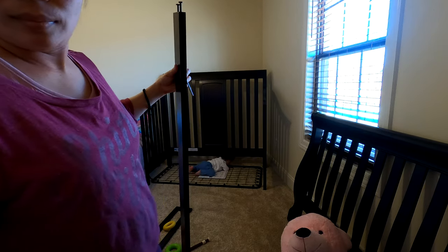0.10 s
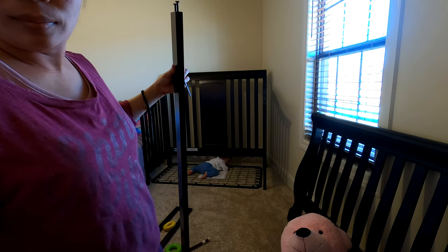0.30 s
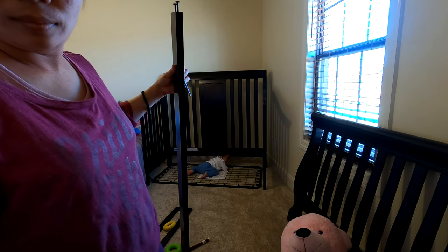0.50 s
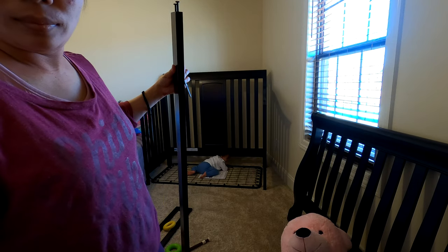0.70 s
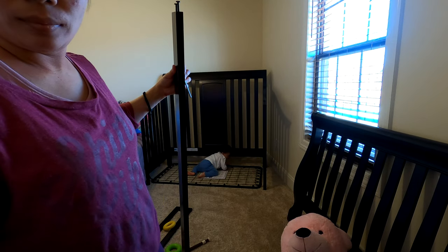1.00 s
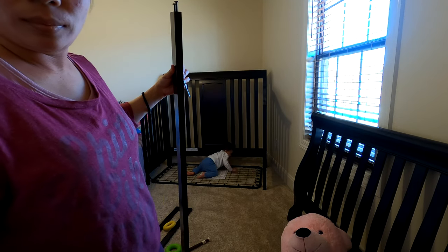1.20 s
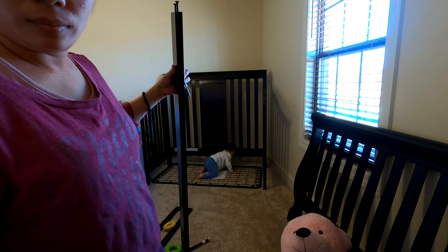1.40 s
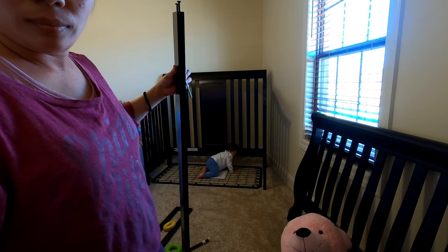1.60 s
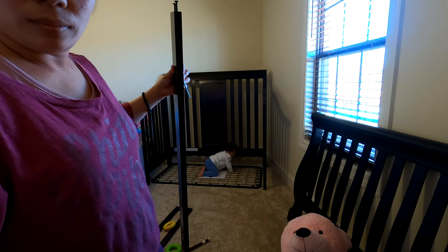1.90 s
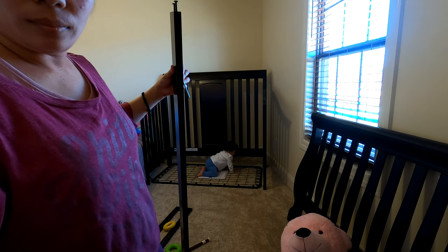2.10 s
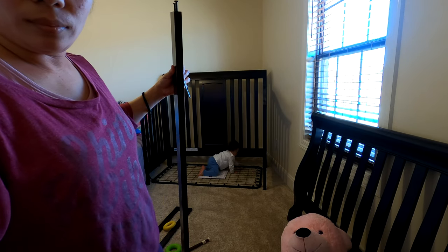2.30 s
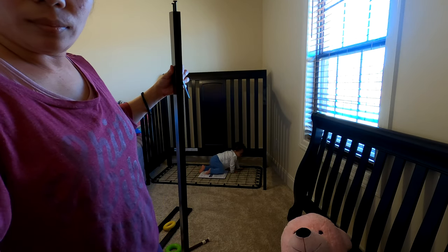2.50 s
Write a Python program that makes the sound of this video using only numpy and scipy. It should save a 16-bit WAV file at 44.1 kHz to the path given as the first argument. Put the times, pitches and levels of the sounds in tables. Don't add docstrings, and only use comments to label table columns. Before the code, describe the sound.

Close up and slightly left, a burst of bright metal clatter with a dull frame boom fades into scraping wire, pauses, then returns as clanks and short scrapes, with soft cloth rustle and a brief room echo.

```python
import sys
import numpy as np
from scipy import signal
from scipy.fft import rfft, irfft, next_fast_len
from scipy.io import wavfile
from scipy.ndimage import uniform_filter1d

SR = 44100
rng = np.random.default_rng(int(sys.argv[2]) if len(sys.argv) > 2 else 0)


def output_pcm(signal):
    pcm = np.clip(np.atleast_2d(signal).T, -1, 1) * 32767
    wavfile.write(sys.argv[1], SR, np.round(pcm).astype(np.int16))


def linear_from_db(decibels):
    return 10 ** (np.asarray(decibels, float) / 20)


N = 116865

# [f/Hz, level/dB, T60/s]
BAR_MODES = [(913, -14, 0.23), (1690, -5, 0.15), (1925, 1, 0.053), (1962, -2.5, 0.035), (1997, -2.5, 0.072),
             (2033, 0, 0.12), (2090, -6.5, 0.058), (2184, -5, 0.086), (2353, -7, 0.092),
             (3200, -0.5, 0.072), (3226, -3.5, .06), (3313, -7, 0.14), (3740, -10, 0.081),
             (4140, -14.5, 0.078)]
# [f/Hz, level/dB, T60/s]
FRAME_MODES = [(94.8, -8.5, 0.42), (114.9, -4, 0.28), (135.3, -16, 0.16), (218, -13, 0.28)]
# [f/Hz, level/dB]
SCRAPE_COLOUR = [(70, -39), (120, -0.5), (500, -4.5), (1200, -1.5), (2050, 1), (3400, -15.5), (5500, -26.5),
                 (11000, -66)]
# [f/Hz, level/dB]
CRACK_COLOUR = [(300, -23), (900, -9.5), (2050, 3), (3300, 1.5), (5300, -12.5), (9000, -44)]
BAR_DB = -13
SOFT_HZ = 5860


def rms_one(x):
    return x / np.sqrt(np.mean(x ** 2) + 1e-20)


def shaped(x, points, phase=False):
    hz, values = np.transpose(points)
    size = next_fast_len(N + 4096)
    bins_hz = np.arange(size // 2 + 1) * SR / size
    curve = np.interp(np.log(bins_hz + 1), np.log(hz), values)
    response = np.exp(1j * curve) if phase else linear_from_db(curve)
    return irfft(rfft(x, size) * response, size)[..., :N]


def soft(x, hz):
    return signal.sosfilt(signal.butter(2, min(hz, .45 * SR), fs=SR, output="sos"), x)


def drift(rate):
    r = np.exp(-2 * np.pi * rate / SR)
    noise = rng.standard_normal(N + SR)
    return rms_one(signal.lfilter([1], [1, -2 * r, r * r], noise)[SR:])


def patchy(x):
    edges = [30, 500, 1100, 1900, 3200, 20000]
    out = 0
    for k, band in enumerate(zip(edges, edges[1:])):
        part = signal.sosfilt(signal.butter(2, band, "band", fs=SR, output="sos"), x)
        out = out + linear_from_db(2.5 * drift(9)) * part * (-1) ** k
    return out


def ring(clicks, hz, t60):
    r = linear_from_db(-60 / (max(t60, .005) * SR))
    w = 2 * np.pi * hz / SR
    return signal.lfilter([0, np.sin(w)], [1, -2 * r * np.cos(w), r * r], clicks + 1e-18)


def strike(s, db, modes, contact_s, spread_db, count=4):
    s, db, out = np.array(s)[:, None], np.array(db)[:, None], 0
    delay_s = contact_s * np.arange(count) / count * rng.uniform(.6, 1.4, (len(s), count))
    at = ((s + delay_s) * SR).astype(int)
    for hz, level_db, t60 in modes:
        clicks = np.zeros(N)
        heights = linear_from_db(db + level_db + spread_db * rng.standard_normal(at.shape))
        signs = rng.choice([-1, 1], at.shape)
        np.add.at(clicks, at, heights * signs / np.sqrt(count))
        out = out + ring(clicks, hz, t60)
    return out


def burst(s, db, colour, t60):
    clicks = np.zeros(N)
    clicks[(np.array(s) * SR).astype(int)] = linear_from_db(np.array(db))
    decay = signal.lfilter([1], [1, -linear_from_db(-60 / (t60 * SR))], clicks)
    envelope = uniform_filter1d(decay, size=30, origin=14)
    return envelope * rms_one(shaped(rng.standard_normal(N), colour))


def swells(rows):
    t, out = np.arange(N) / SR, 0
    for s, length, db in rows:
        arch = np.abs(np.sin(np.pi * np.clip((t - s) / length, 0, 1)))
        out = out + linear_from_db(db) * arch ** 1.09
    return out


def pan(x, db):
    return x * linear_from_db(np.array([[db / 2], [-db / 2]]))


def floor():
    # [t/s, length/s, level/dB]
    weight = [
        (-.1, 0.77, -46),
        (.6, 0.94, -59.5),
        (1.22, 0.34, -42),
        (1.36, 0.13, -39),
        (1.45, .14, -44.5),
        (1.65, 0.9, -50),
    ]
    # [f/Hz, level/dB]
    air_colour = [(35, 3), (60, -2), (194, 1), (388, -16.5), (1910, -20), (9000, -34.5), (11700, -57.5),
                  (19800, -120)]
    white = rng.standard_normal((6, N))
    band = signal.butter(3, [35, 65], "band", fs=SR, output="sos")
    low = rms_one(signal.sosfilt(band, white[0] + 0.232 * white[1:3]))
    boards = shaped(white[0], [(90, -33.5), (170, 4.5), (280, -6), (600, -37.0), (8000, -101)])
    low = low + linear_from_db(-9.5) * rms_one(boards)
    air = rms_one(shaped(white[3] + 0.11 * white[4:], air_colour))
    return (swells(weight) + linear_from_db(-68.5)) * rms_one(low) + linear_from_db(-52) * air


def cloth():
    # [t/s, length/s, level/dB]
    rubs = [
        (-.05, 0.76, -48.5),
        (.25, 0.29, -49),
        (.85, 0.24, -53),
        (1.15, 0.2, -56),
        (1.3, 0.27, -53.5),
        (1.42, .24, -47.5),
        (2.2, 0.18, -46.5),
        (2.4, 0.23, -51),
    ]
    # [f/Hz, level/dB]
    cloth_colour = [(470, -7.5), (800, -12.5), (4290, -9.5), (9800, -21.5), (11000, -29), (13500, -31.5),
                    (16000, -61.5)]
    white = rng.standard_normal((3, N))
    rustle = rms_one(shaped(white[0] * 0.31 + white[1:], cloth_colour))
    return swells(rubs) * linear_from_db(-0.5 + 1.45 * drift(23)) * rustle


def bedroom(x):
    t60_s, wall_cut_hz = 0.35, 6400
    size = next_fast_len(N + SR)
    w = 2 * np.pi * np.arange(size // 2 + 1) / size
    dull = 1 / (1 + 1j * w * SR / (2 * np.pi * wall_cut_hz))
    out = np.zeros((2, len(w)), complex)
    for k, lag in enumerate(rng.uniform(.008, .03, 16) * SR):
        loop = linear_from_db(-60 * lag / SR / t60_s) * dull * np.exp(-1j * w * int(lag))
        out[k % 2] += loop / (1 - loop) * (-1) ** (k // 2)
    return irfft(out * rfft(x, size), size)[:, :N]


def hook():
    # [t/s, level/dB]
    clinks = [(0.6379, -68), (0.7883, -35), (0.8439, -25.5), (0.8905, -45), (1.709, -51.5), (1.8238, -25.5),
              (1.8653, -37), (2.3395, -32.5), (2.3512, -28), (2.3745, -43), (2.5471, -42), (2.5792, -32.5),
              (2.603, -30.5)]
    # [f/Hz, level/dB, T60/s]
    hook_modes = [(9390, 0, 0.2), (9440, 2.5, 0.2), (9630, -14, 0.14), (14560, -35, .12), (14800, -21, .2),
                  (12350, -28, 0.11), (11500, -30, .1), (10530, -36, 0.1)]
    s, db = np.transpose(clinks)
    hook_db, tick_db = -5.5, -14.5
    both = strike(s, db + hook_db, hook_modes, .001, spread_db=1.0, count=1)
    own = np.array([strike(s, db + hook_db - 26.5, hook_modes, .001, spread_db=7.0, count=1) for _ in "LR"])
    colour = [(2500, -15), (5000, 0), (9000, 10), (11000, -7), (13000, -10), (16000, -23.5)]
    tick = burst(s, db + tick_db, colour, 0.032)
    tick = tick + np.array([burst(s, db + tick_db, colour, 0.1) for _ in "LR"])
    return (both + own) * linear_from_db(4.4 * drift(27)) + tick


def wire():
    # [t/s, length/s, level/dB, f/Hz]
    groans = [(.88, .2, -52, 1840), (1.5, .08, -44, 235), (1.34, .1, -49, 285), (1.335, .04, -54, 520),
              (1.34, .08, -55, 740), (1.605, .04, -50, 640), (1.51, .06, -51, 1000), (2.555, .06, -40, 340),
              (1.69, .12, -42, 340), (1.835, .09, -33, 223), (.62, .25, -41, 226), (2.37, .06, -42, 218),
              (.163, .07, -37, 335), (.165, .05, -44, 480)]
    t60_s, out = .055, 0
    for s, length, db, hz in groans:
        hum = ring(ring(rng.standard_normal(N), hz, t60_s), hz, t60_s)
        even = hum / np.sqrt(uniform_filter1d(hum ** 2, size=1800))
        out = out + swells([(s, length, db)]) * even
    return out


def frame():
    # [t/s, level/dB]
    jolts = [(0.166, -16.5), (0.251, -8.5), (0.301, -9), (0.355, -9), (0.408, -21.5), (.445, -22),
             (0.476, -22.5), (0.641, -38), (0.752, -30.5), (0.82, -46), (1.702, -37), (1.84, -28),
             (1.9, -27.5), (2.338, -29), (2.389, -36.5)]
    s, db = np.transpose(jolts)
    thud_colour = [(60, -28.0), (150, 7.0), (450, -11.0), (1500, -16.0), (8000, -94.0)]
    thud = burst(s, db - 9, thud_colour, 0.1)
    boom = soft(strike(s, db, FRAME_MODES, .003, spread_db=0.5, count=1), 589)
    return signal.sosfilt(signal.butter(3, 75, "high", fs=SR, output="sos"), boom + thud)


def strokes():
    # [t/s, length/s, first level/dB, last level/dB, brightness/dB]
    load = [(0.239, 0.36, -25.5, -32, 0), (0.605, 0.091, -29, -23, 5), (0.66, 0.19, -23, -27.5, 1.5),
            (0.872, 0.23, -40.5, -59.5, -3), (1.336, 0.17, -57.5, -48, -2.5),
            (1.504, 0.074, -40.5, -44, -5.5), (1.6, 0.082, -47, -53, -12), (1.686, 0.076, -29, -26, 0.5),
            (1.773, 0.23, -32, -38.5, 1.5), (1.832, 0.13, -20.5, -33, 2), (1.942, 0.44, -36.5, -35.5, -9),
            (2.216, 0.042, -28, -22.5, 0), (2.24, 0.077, -20.5, -28, -0.5),
            (2.315, 0.046, -22.5, -24.5, 1.5), (2.401, 0.12, -45, -43, -3),
            (2.548, 0.069, -29.5, -31, -2.5)]
    grip_s, let_go_t60_s = 0.014, 0.18
    t, out = np.arange(N) / SR, 0
    for s, length, first_db, last_db, bright_db in load:
        slide_db = np.interp(t, [s, s + length], [first_db, last_db])
        db = slide_db - 60 * np.maximum(t - s - length, 0) / let_go_t60_s
        grip = np.clip((t - s) / grip_s, 0, 1)
        out = np.maximum(out, pan(linear_from_db(db) * grip, -bright_db))
    return out


def slip_rings(slips, signs, modes, hz_ratio, t60_ratio):
    out = 0
    for k, (hz, level_db, t60) in enumerate(modes):
        out = out + linear_from_db(level_db) * ring(slips * signs[k % 3], hz * hz_ratio, t60 * t60_ratio)
    return out


def mesh():
    # [t/s, level/dB]
    knocks = [(0.884, -28), (1.342, -47), (1.425, -47), (1.47, -44.5), (1.499, -48), (1.529, -40),
              (1.545, -38.5), (1.562, -58), (1.617, -43), (1.841, -13.5), (2.403, -20.5)]
    # [f/Hz, level/dB, T60/s]
    mesh_modes = [(501, -13.5, 0.13), (637, -12.5, .05), (941, -6, 0.1), (987.6, 1, 0.049),
                  (1199, 3.5, 0.041), (1481.5, -2, 0.059), (1449, -9.5, 0.18), (1561, -10.5, 0.087),
                  (1694, -2.5, 0.052), (1850, -3, 0.051), (2175, -12.5, 0.12), (2565, -4, 0.02),
                  (2970, -2.5, 0.02), (4080, -18.5, 0.016)]
    # [t/s, length/s, level/dB]
    drags = [
        (.52, 0.1, -33),
        (.59, 0.15, -29.5),
        (.7, 0.15, -31.5),
        (2.22, 0.16, -27.5),
    ]
    load = strokes() * linear_from_db(1.0 * drift(24))
    slips_per_s, slip_spread_db = 1200, 2.5
    heights = linear_from_db(slip_spread_db * np.minimum(rng.exponential(1, N), 4))
    slips = (rng.random(N) < slips_per_s / SR) * heights
    signs = rng.choice([-1, 1], (3, N))

    rings = slip_rings(slips, signs, mesh_modes, 1, 1.26)
    hiss_level = 5.4 + uniform_filter1d(slips, size=60) * 30
    hiss = shaped(rng.standard_normal(N) * hiss_level, SCRAPE_COLOUR)
    booms = slip_rings(slips, signs, FRAME_MODES, 2, .5)
    drag = slip_rings(slips, signs, BAR_MODES, 1, 0.63)

    rub = linear_from_db(-6) * rms_one(soft(patchy(rings), SOFT_HZ * 1.75))
    rub = rub + linear_from_db(-2.5) * rms_one(soft(patchy(hiss), 7000))
    rub = rub + linear_from_db(-21) * rms_one(soft(booms, 473))
    lows = soft(rub, 1400)
    scrape = load[0] * lows + load[1] * (rub - lows)
    scrape = scrape + swells(drags) * rms_one(soft(drag, 2900))

    s, db = np.transpose(knocks)
    hits = strike(s, db - 6, mesh_modes, .007, spread_db=5, count=6)
    return hits + burst(s, db - 14.0, CRACK_COLOUR, 0.052) + scrape


def bar():
    # [t/s, level/dB]
    rattle = [(0.2489, -2.5), (0.2539, -1.5), (0.2736, -4.5), (0.2914, -6), (0.3, -4.5), (0.3105, -4.5),
              (0.3183, -9), (0.3416, -6.5), (0.352, -6), (0.3582, -1.5), (0.3801, -12), (0.399, -4),
              (0.4093, -1.5), (0.4224, -5.5), (0.4392, -5.5), (0.4484, -7.5), (0.4647, -8.5),
              (0.4828, -12.5), (0.5008, -15.5), (0.5132, -19), (0.535, -21.5)]
    # [f/Hz, level/dB, T60/s]
    rail_modes = [(1064, -7, .08), (1534, -32, 0.077), (1908, -7.5, 0.088), (2630, -17.5, .07),
                  (2820, -10, 0.18), (3800, -2.5, 0.033), (4000, -9, 0.096), (4590, -7.5, 0.043),
                  (4320, -8, 0.065), (4716, -7, .06), (4930, -7, 0.043), (5610, -15, .05),
                  (5640, -21.5, 0.043)]
    # [t/s, level/dB]
    tap_times = [(.166, -24), (0.213, -41.5), (0.642, -15), (0.652, -16), (0.804, -20), (1.84, -3),
                 (1.845, -1.5), (1.970, -15.5), (1.974, -4), (2.026, -8), (2.080, -11), (2.119, -22.5),
                 (2.125, -21), (2.388, -9.5), (2.498, -33)]
    # [f/Hz, level/dB, T60/s]
    held_modes = [(1051, -4.5, 0.07), (2040, 3.5, 0.038), (1970, -8.5, .12), (3254, 3, 0.025),
                  (4124, -3, 0.022), (4696, -5.5, 0.015), (5290, -6, 0.012)]
    s, db = np.transpose(rattle)
    hits = soft(strike(s, db + BAR_DB, BAR_MODES + rail_modes, .003, spread_db=2.0), SOFT_HZ * 1.08)
    crack = burst(s, db - 4, CRACK_COLOUR, 0.015)
    bright = burst(s, 2.2 * db - 20.5, [(2500, -30.5), (5000, -1), (9000, -13.5), (16000, -26)], 0.037)
    tail = burst(s, db - 30.5, SCRAPE_COLOUR, 0.25)
    hits = hits + crack + bright + tail

    s, db = np.transpose(tap_times)
    taps = strike(s, db + BAR_DB, held_modes, 0.00299, spread_db=0.5, count=2)
    taps = taps + burst(s + 0.00087, db - 14, CRACK_COLOUR, 0.041)
    snap = burst(s + 0.00326, db - 30, [(3000, -14), (5200, -0.5), (9000, -13), (13000, -38)], 0.011)
    return hits + soft(soft(taps, SOFT_HZ), SOFT_HZ * 0.78) + snap


def scene():
    rattle = bar()
    wires = mesh() + wire()
    clink = hook()
    near = pan(rattle, 5) + pan(wires, 2.5) + pan(clink, 1.5) + pan(frame(), 1.0)
    room = linear_from_db(-18) * bedroom(rattle + wires + 0.86 * clink[0])
    return near + room + pan(cloth(), 0.8) + floor()


def band_limit(x):
    return signal.sosfilt(signal.butter(12, 16740, fs=SR, output="sos"), x)


def record(dry):
    # [f/Hz, phase/rad]
    left_lead = [(300, 0.037), (1000, -0.57), (2000, -1.02), (3000, -1.47), (4500, 0.92), (9000, 1.6)]
    x = np.array([shaped(dry[0], left_lead, phase=True), dry[1]])
    top_cut = signal.cheby2(8, 40, 16800, fs=SR, output="sos")
    x = signal.sosfilt(top_cut, np.clip(x, -1, 1))
    return band_limit(x)


dry = scene()
out = record(dry)
output_pcm(out)
```